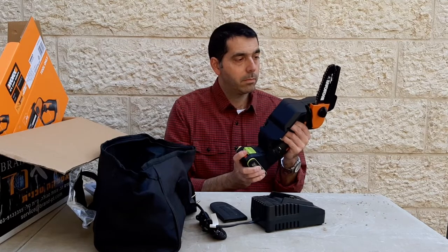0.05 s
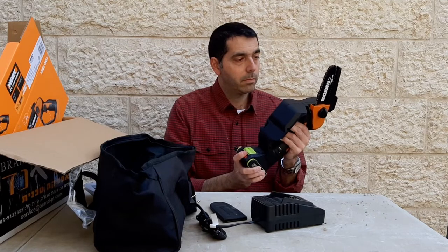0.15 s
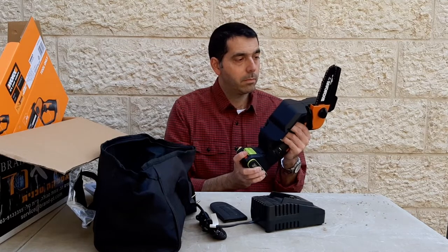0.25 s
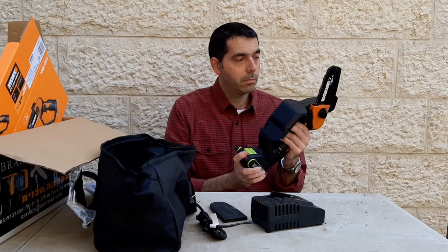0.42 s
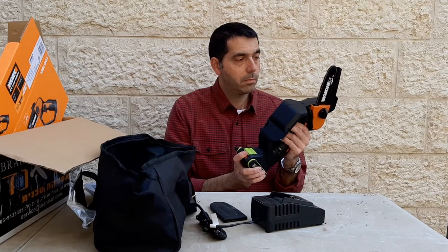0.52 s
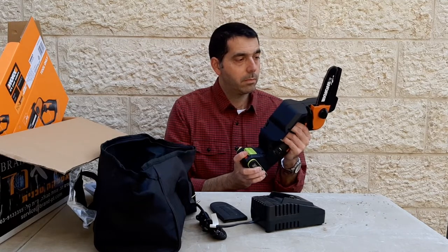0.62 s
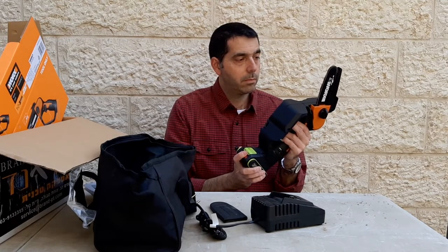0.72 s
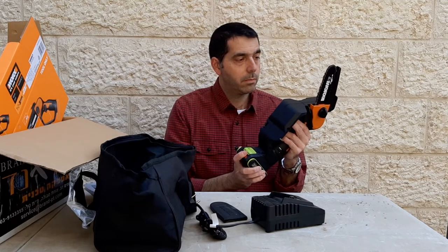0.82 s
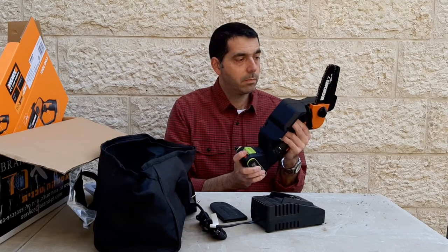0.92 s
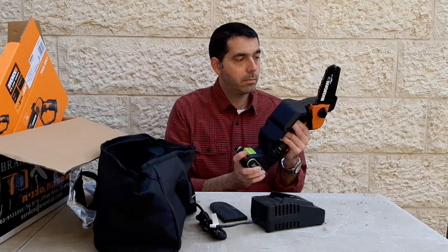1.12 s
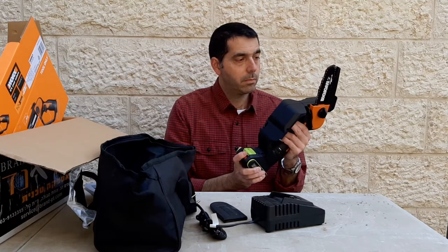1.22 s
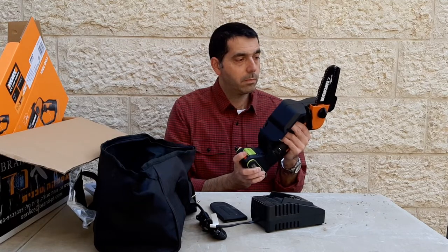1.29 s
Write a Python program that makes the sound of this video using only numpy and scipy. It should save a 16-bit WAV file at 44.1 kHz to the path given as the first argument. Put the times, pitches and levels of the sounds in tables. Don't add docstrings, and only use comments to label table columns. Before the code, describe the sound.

A handheld electric chainsaw gives one short burst: click, rising whine, chain rattle, clattering coast-down.

```python
import sys
import numpy as np
from scipy import signal
from scipy.fft import rfft, irfft
from scipy.io import wavfile
from scipy.ndimage import uniform_filter1d

SR = 44100
rng = np.random.default_rng(int(sys.argv[2]) if len(sys.argv) > 2 else 0)


def wav_record(signal):
    frames = np.transpose(np.atleast_2d(signal))
    bounded = np.clip(frames, -1, 1)
    quanta = np.round(bounded * 32767).astype(np.int16)
    wavfile.write(sys.argv[1], SR, quanta)


def elevation(decibels):
    levels = np.asarray(decibels, float)
    return 10 ** (levels / 20)


N = 59535
T = np.arange(N) / SR

# t/s, commutation rate f/Hz
SPEED = [(.181, 0), (.3, 290), (.43, 600), (.52, 790), (.6, 935), (.66, 1035), (.705, 810), (.8, 540),
         (.92, 240), (1.02, 10)]
# f/Hz, bandwidth/Hz, level/dB
BAR = [(436, 260, -20), (847, 180, -11), (1593, 410, -7.5), (2820, 820, -5), (3596, 400, -3.5),
       (4900, 670, -3.5), (5700, 700, -5.5), (7190, 500, -1.5), (8056, 1400, -2.5), (9480, 940, -6),
       (11340, 1500, -16)]


def evened(x):
    return x / np.sqrt(np.mean(x ** 2) + 1e-20)


def curve(points):
    return np.interp(T, *np.transpose(points))


def coloured(x, points):
    hz, db = np.transpose(points)
    f = np.fft.rfftfreq(len(x), 1 / SR)
    gain = elevation(np.interp(np.log(f + 1), np.log(hz + 1), db))
    return irfft(rfft(x) * gain, len(x))


def ring(x, hz, width):
    r = np.exp(-np.pi * width / SR)
    pole = r * np.exp(2j * np.pi * hz / SR)
    return 2 * signal.lfilter([1 - r], [1, -pole], x).real


def drift(size):
    return evened(uniform_filter1d(uniform_filter1d(rng.standard_normal(N), size), size))


def street():
    # f/Hz, level/dB
    air_spectrum = [(20, -8.5), (50, -2), (100, -12.5), (300, -12), (630, -25), (1750, -39.5),
                    (5000, -51.5), (16500, -51.5)]
    # t/s, level/dB
    drone_level = [(0, -43), (.15, -45), (.22, -38.5), (.42, -41), (.5, -44.5), (1.35, -53.5)]
    air = elevation(-49 + 0.89 * drift(size=3000)) * evened(coloured(rng.standard_normal(N), air_spectrum))
    drone_hz, width_hz = 69.7, 26
    drone = ring(ring(rng.standard_normal(N), drone_hz, width_hz), drone_hz, width_hz)
    return air + elevation(curve(drone_level)) * evened(drone)


def birds():
    # t/s, duration/s, start f/Hz, end f/Hz, level/dB
    whistles = [
        (.105, .04, 3250, 3200, -68),
        (1.18, .035, 2600, 2500, -67),
        (1.215, .05, 2150, 2080, -70),
        (1.225, .025, 2500, 2550, -72),
    ]
    out = np.zeros(N)
    for start, length, from_hz, to_hz, db in whistles:
        u = np.clip((T - start) / length, 0, 1)
        phase = 2 * np.pi * np.cumsum(from_hz + (to_hz - from_hz) * u) / SR
        out += elevation(db) * np.sin(np.pi * u) * np.cos(phase)
    return out


def wall(x):
    t60_s, size = 0.17, 12000
    taps = np.zeros(size)
    places = np.arange(100, 11960, 20) + rng.integers(0, 20, 593)
    taps[places] = rng.choice([-1., 1.], 593)
    taps *= elevation(-60 * np.arange(size) / SR / t60_s)
    return signal.oaconvolve(x, taps / np.linalg.norm(taps))[:N]


def clicks():
    # t/s, level/dB, pitch f/Hz, t60/s
    snaps = [
        (.1893, -19, 6000, .007),
        (.1894, -22, 8500, .007),
        (.187, -26, 870, .05),
        (.187, -27, 280, .06),
        (.2315, -36, 13000, .01),
        (.256, -34, 13000, .01),
        (1.3022, -42, 1650, .022),
        (1.3023, -47, 2900, .012),
        (1.3023, -55, 4300, .01),
        (1.332, -54, 1600, .02),
    ]
    out = np.zeros(N)
    t = np.arange(2000) / SR
    for start, db, hz, t60 in snaps:
        noise = rng.standard_normal(len(t)) * elevation(-60 * t / t60)
        body = 3 * ring(noise, hz, 0.18 * hz)
        tick = 0.22 * (hz / 8000) ** 2 * np.diff(noise, prepend=0) * elevation(-60 * t / 0.0036)
        part = out[round(start * SR):][:len(t)]
        part += elevation(db) * (body + tick)[:len(part)]
    return out


def housing(hz):
    # f/Hz, bandwidth/Hz, level/dB
    shell = [(1490, 220, 15), (2600, 500, 3), (3680, 300, 8)]
    return 1 + sum(elevation(db) / (1 + (2 * (hz - f) / w) ** 2) for f, w, db in shell)


def whine(hz, turn):
    # multiple of switching rate, carrier level/dB, sideband level/dB, change/(dB/s)
    harmonics = [(1, -30, -44, 26), (2, -32, -49, 0), (3, -52, -58, -40), (4, -38, -45, -90),
                 (5, -47, -60, -120), (6, -45, -60, -150), (8, -49, -60, -40)]
    switch_hz = 1943.8
    on_s, full_s, swell_s = .181, .54, 0.019
    since = np.maximum(T - on_s, 0)
    closing = np.clip((full_s - T) / .09, 0, 1)
    out = np.zeros(N)
    for k, db, side_db, fade_db in harmonics:
        f = k * switch_hz
        phase = 2 * np.pi * (f * T + rng.random())
        gate = closing * np.clip(since / (0.0022 + swell_s / k ** 3), 0, 1)
        sides = housing(f - hz) * np.cos(phase - turn) + housing(f + hz) * np.cos(phase + turn)
        tone = elevation(db) * np.cos(phase) + elevation(side_db + 21.3 * since) * sides
        out += gate * elevation(fade_db * since + 1.5 * drift(size=300)) * tone
    return out


def singing(turn):
    # multiple of commutation rate, centre t/s, half length/s, level/dB
    spells = [(.55, .41, .06, -32), (.47, .55, .06, -37), (.55, .775, .06, -34), (1.78, .38, .06, -38),
              (1.79, .585, .115, -21.5), (1.66, .61, .08, -23), (3.05, .33, .07, -34),
              (3.05, .39, .04, -24), (3, .46, .06, -27), (3, .6, .07, -30), (3, .72, .04, -36),
              (3.05, .84, .08, -36), (3.7, .725, .04, -31)]
    out = np.zeros(N)
    for k, centre, half, db in spells:
        swell = np.cos(np.pi / 2 * np.clip((T - centre) / half, -1, 1))
        out += swell * elevation(db + 1.5 * drift(size=400)) * np.cos(k * turn + .4 * drift(size=400))
    return out


def motor():
    hz = curve(SPEED)
    turn = 2 * np.pi * np.cumsum(hz) / SR
    return whine(hz, turn) + singing(turn)


def struck(hits):
    u = np.arange(400) / SR / 0.001
    out = np.zeros(N)
    for f, w, db in BAR:
        luck = elevation(3 * rng.standard_normal(N))
        drive = signal.oaconvolve(hits * luck, u * np.exp(1 - u))[:N] * np.sign(rng.standard_normal(N))
        out += elevation(db - 9.8 * (f < 2000)) * ring(ring(drive, f, 3 * w), f, w) / np.sqrt(w / 400)
    return out


def dulled(x):
    low = signal.sosfilt(signal.butter(2, 5000, fs=SR, output="sos"), x)
    slowness = np.clip(1 - curve(SPEED) / 200, 0, 1)
    return low + (x - low) * elevation(-12.5 * slowness * (T > .15))


def rattle(turn):
    # f/Hz, level/dB
    hiss_spectrum = [(120, -46.5), (200, -20), (273, -4.5), (635, -14.5), (1270, -10.5), (1620, 3.5),
                     (2420, -12), (7540, -4), (16000, -20)]
    grains_per_s, spread_db, throb_depth = 9000, 3, 0.48
    throb = elevation(10 * throb_depth * (np.sin(np.pi * turn) ** 2 - .5) + 0.5 * drift(size=250))
    size = elevation(spread_db * np.minimum(rng.exponential(1, N), 4))
    grains = evened(size * rng.standard_normal(N) * (rng.random(N) < grains_per_s / SR))
    rung = np.zeros(N)
    for k, (f, w, db) in enumerate(BAR):
        mode = ring(grains * elevation(1.7 * drift(size=150)), f, w) / np.sqrt(w / 400)
        rung += (-1) ** k * elevation(db) * mode
    hiss = evened(coloured(0.44 * grains + rng.standard_normal(N), hiss_spectrum))
    return throb * (elevation(-2) * evened(rung) + elevation(-4.5) * hiss)


def links(turn):
    tooth = np.diff(np.floor(np.maximum.accumulate(turn)), prepend=0) > 0
    taut = np.clip((.62 - T) / 0.017, .2, 1)
    return taut * evened(struck(tooth * elevation(3 * rng.standard_normal(N))))


def hard_slaps(level):
    # t/s, level over the rattle/dB
    slap_times = [(0.373, 1.5), (0.448, 3.5), (0.532, 2), (0.611, 7), (0.6186, 3.5), (0.6276, 5.5),
                  (0.635, 5), (0.6476, 2.5), (0.658, 0), (0.672, 5.5), (.701, 7.5), (.714, 6), (.726, 5.5),
                  (0.733, 7), (0.756, 5.5), (.768, 1.5), (0.774, 10.5), (.792, 4.5), (.818, 11),
                  (0.823, 8.5), (.844, 0.5), (0.858, 6.5), (0.882, 11.5), (.894, 4), (.908, 0), (0.928, 11),
                  (.961, 9.5), (0.9771, 5), (0.9928, 4), (1.0004, 5)]
    hits = np.zeros(N)
    for start, db in slap_times:
        i = round(start * SR)
        hits[i] = elevation(db + 0.5) * level[i]
    return struck(hits)


def chain():
    # t/s, level/dB
    chain_level = [(0, -48), (.085, -72), (.181, -70), (.184, -36), (.21, -30.5), (.24, -30), (.3, -21),
                   (.42, -17), (.55, -14.5), (.65, -15.5), (.7, -18), (.83, -25.5), (.9, -26.5),
                   (.915, -35.5), (.98, -33), (1.015, -46), (1.035, -62.5), (1.11, -76.5)]
    links_per_turn, jitter_links = .125, .3
    turn = np.cumsum(curve(SPEED) * links_per_turn) / SR + jitter_links * drift(size=600)
    level = elevation(curve(chain_level))
    body = rattle(turn) + elevation(-12) * links(turn)
    return dulled(level * body + 3 * hard_slaps(level))


def scene():
    saw = motor() + chain() + clicks()
    return (saw + elevation(-16) * wall(saw) + birds() + street())[None]


def top_cut(x):
    return signal.sosfilt(signal.butter(12, 16850, fs=SR, output="sos"), x)


def record(dry):
    soft = .95 * np.tanh(dry / .95)
    lowpass = signal.firwin(511, 15900, window=("kaiser", 7), fs=SR)
    cut = signal.oaconvolve(soft, lowpass[None], "same")
    return top_cut(cut + elevation(-33) * (soft - cut))


dry = scene()
out = record(dry)
wav_record(out)
```